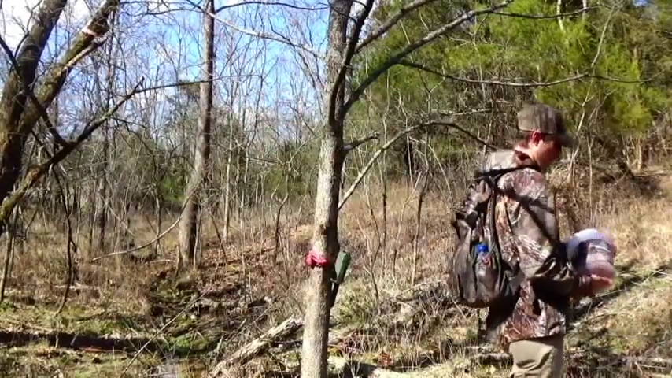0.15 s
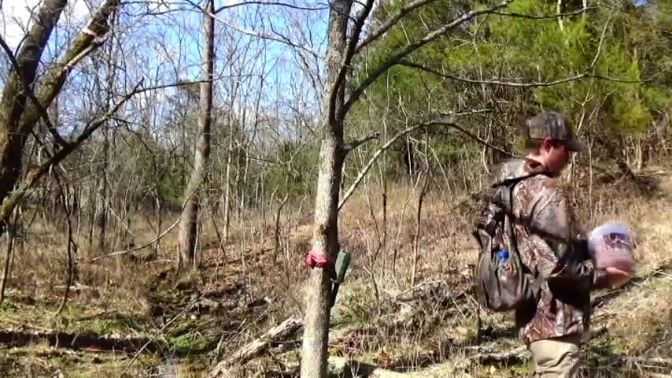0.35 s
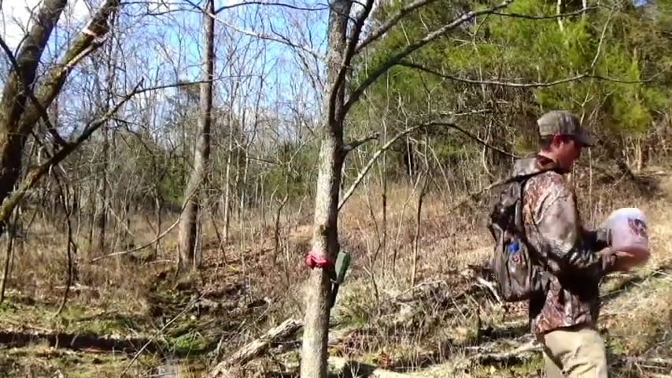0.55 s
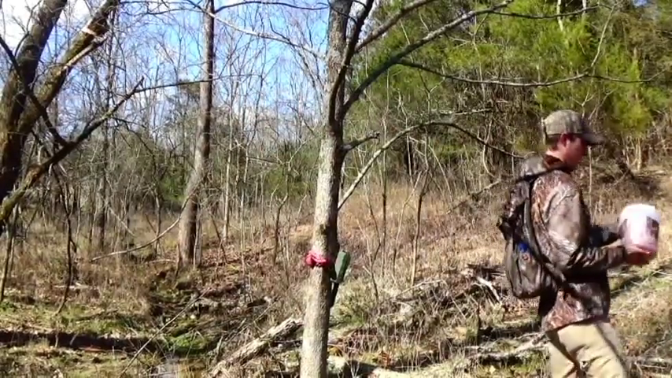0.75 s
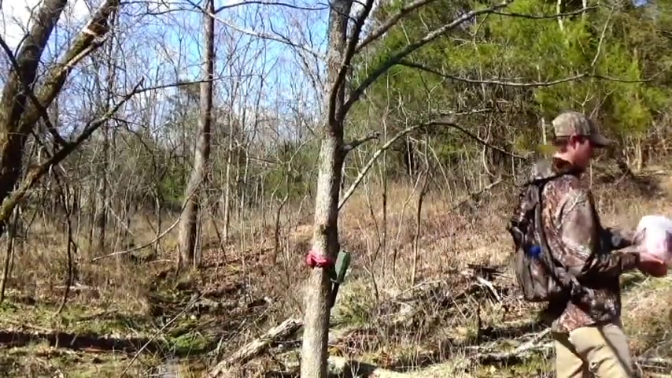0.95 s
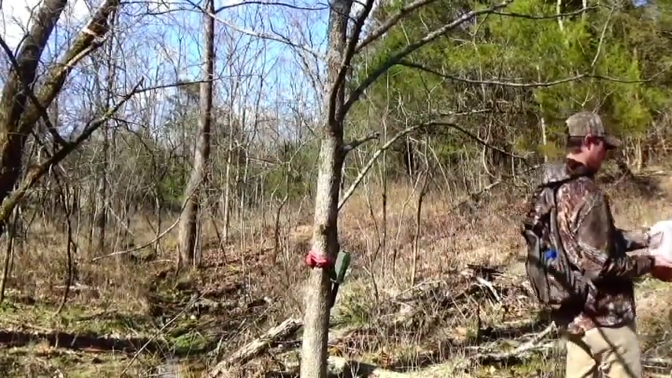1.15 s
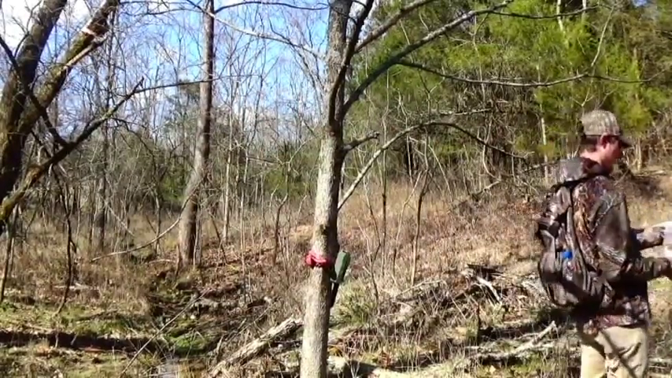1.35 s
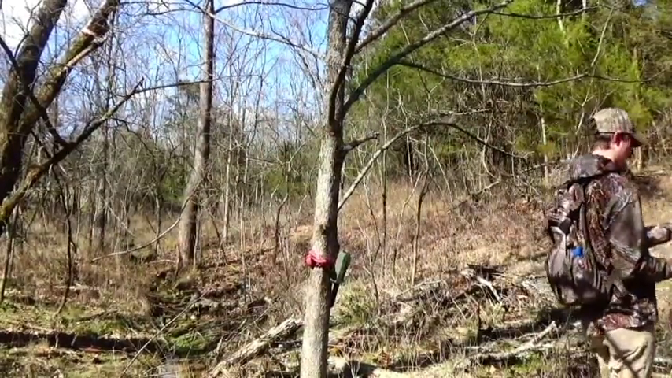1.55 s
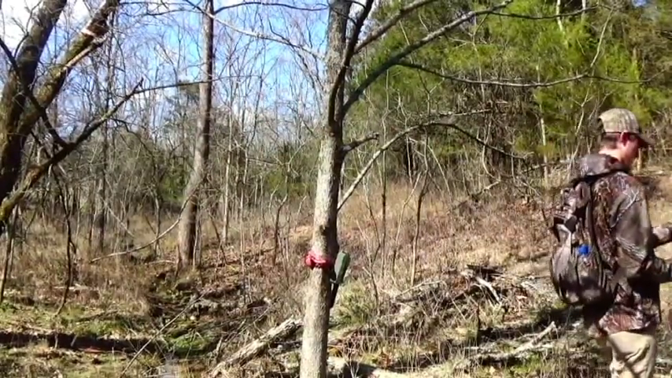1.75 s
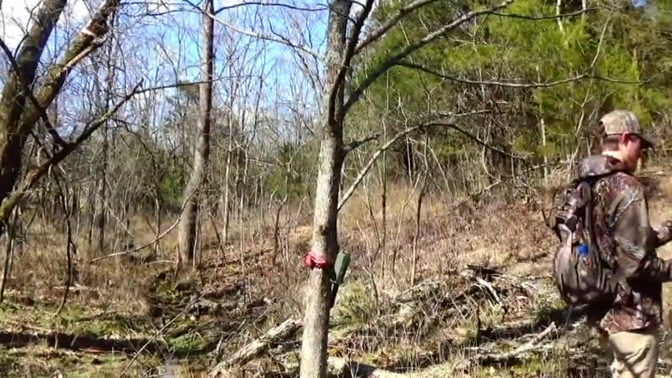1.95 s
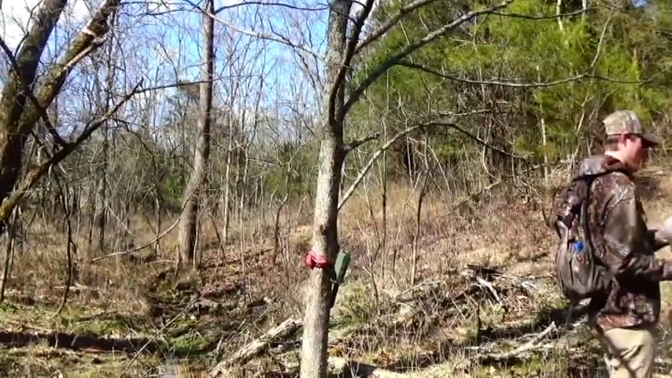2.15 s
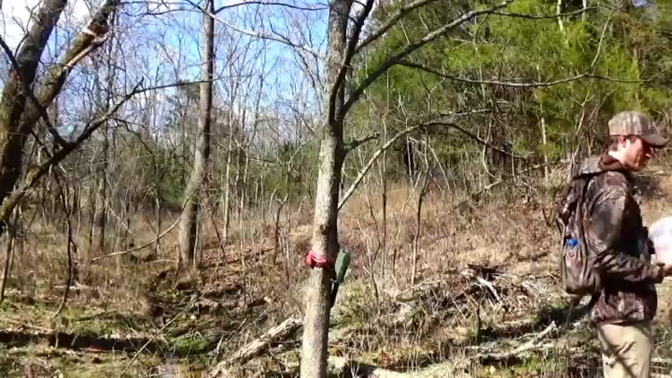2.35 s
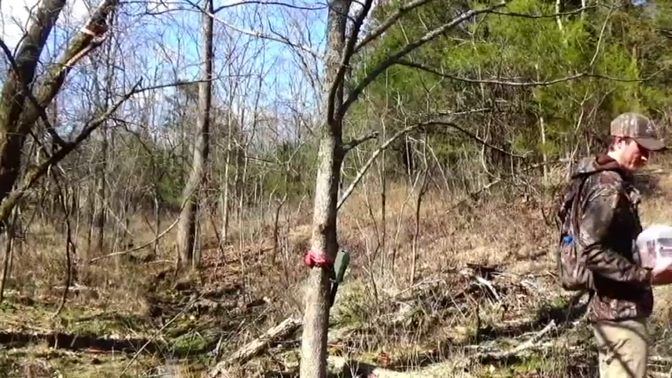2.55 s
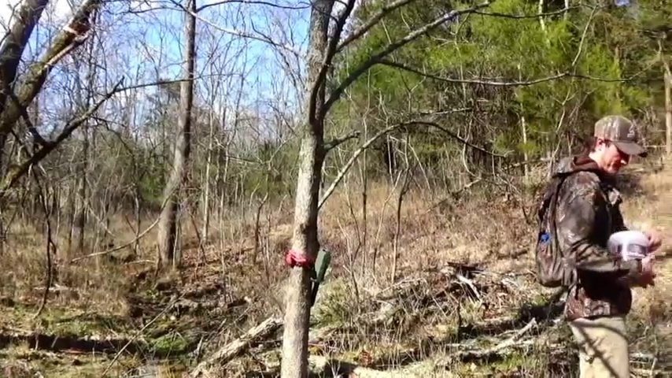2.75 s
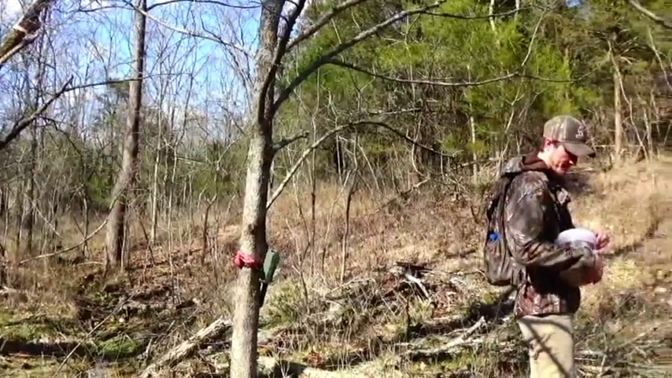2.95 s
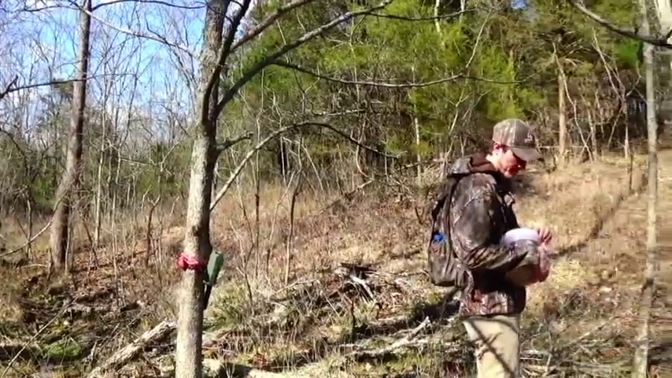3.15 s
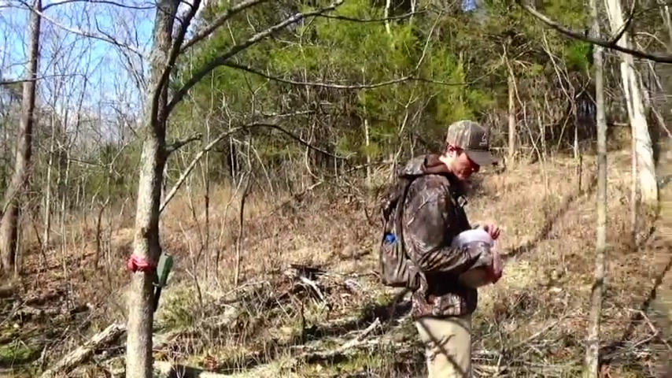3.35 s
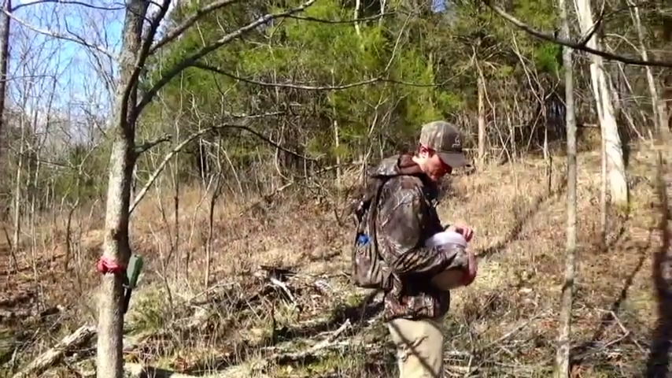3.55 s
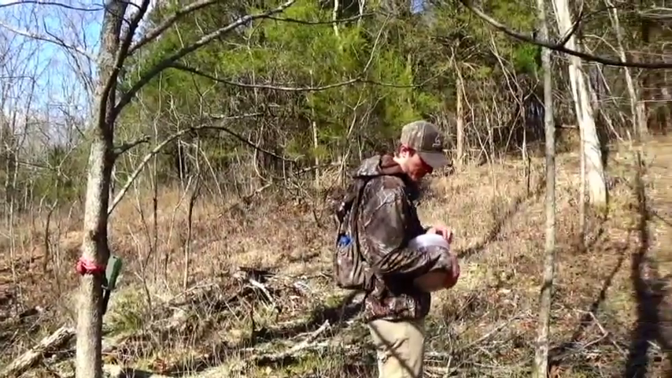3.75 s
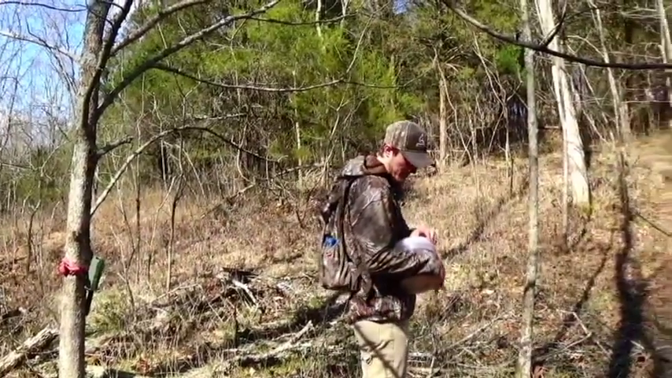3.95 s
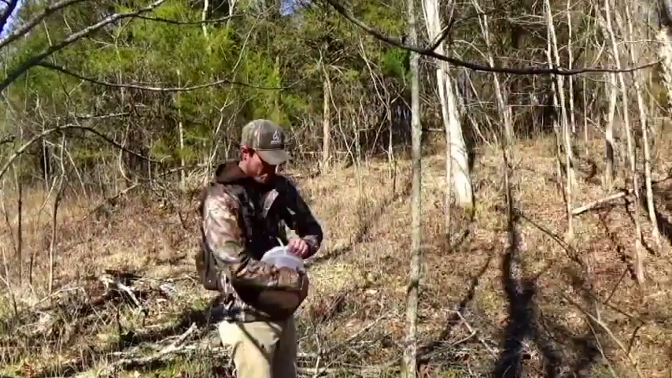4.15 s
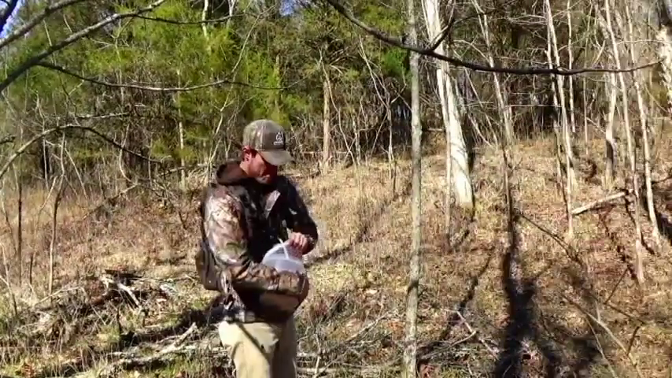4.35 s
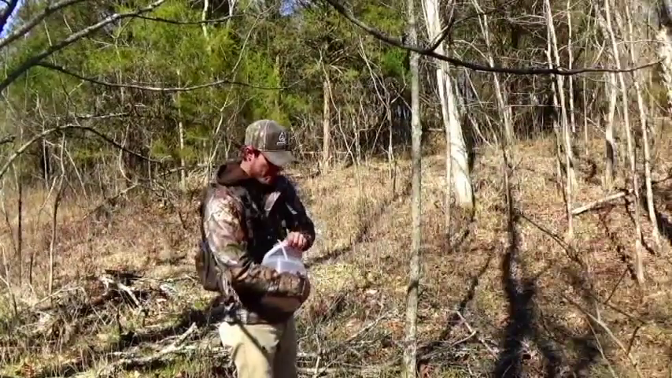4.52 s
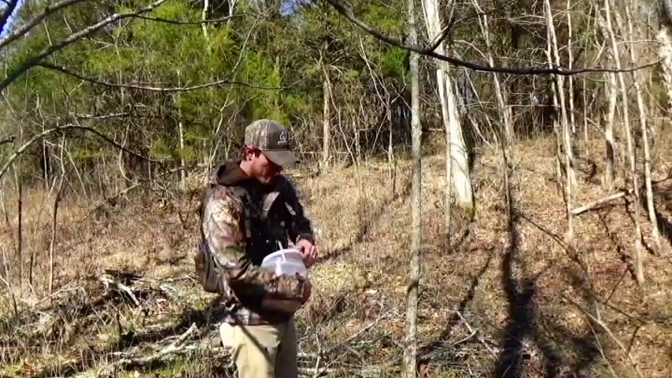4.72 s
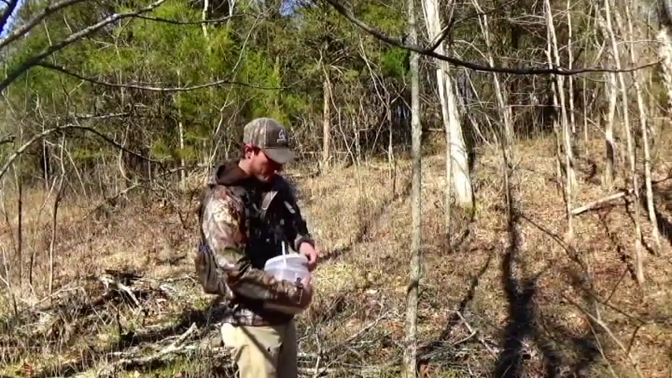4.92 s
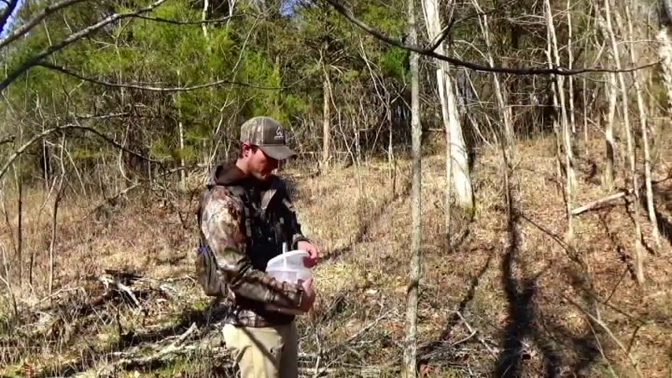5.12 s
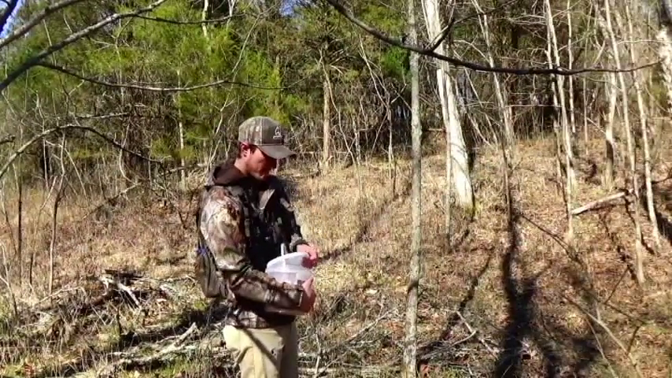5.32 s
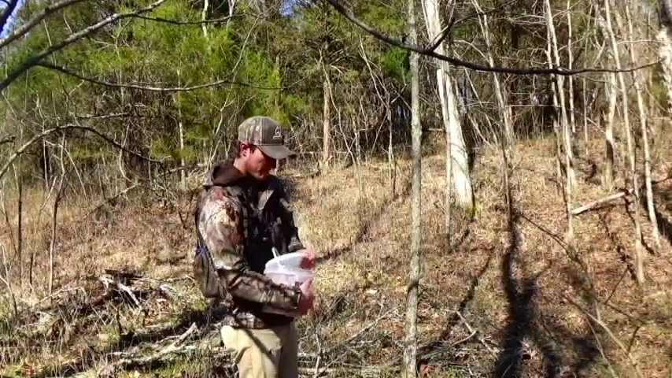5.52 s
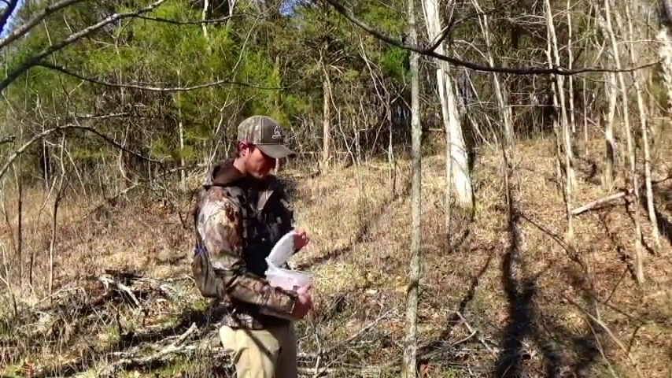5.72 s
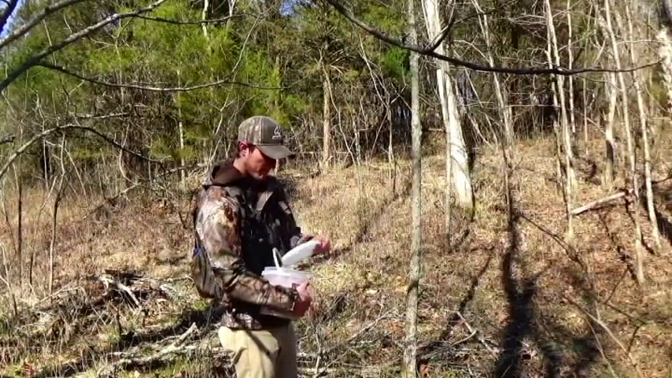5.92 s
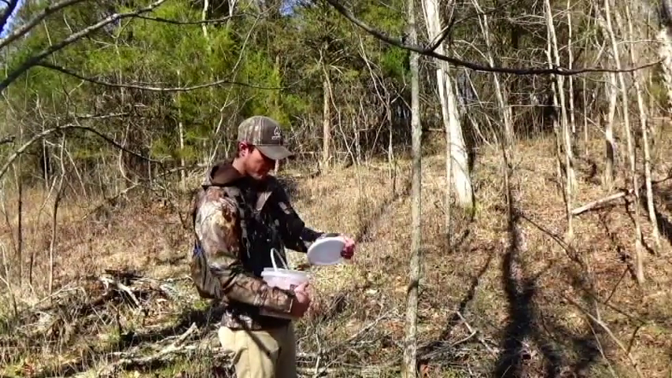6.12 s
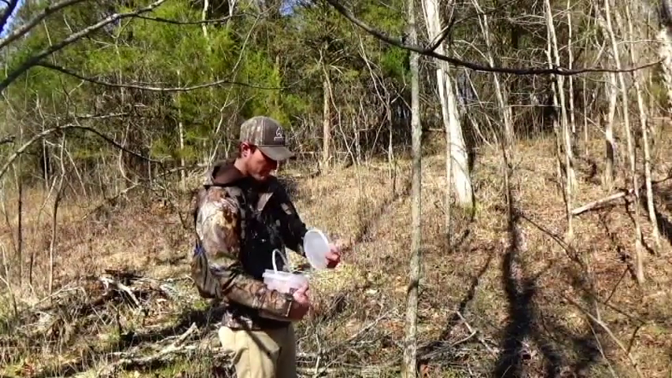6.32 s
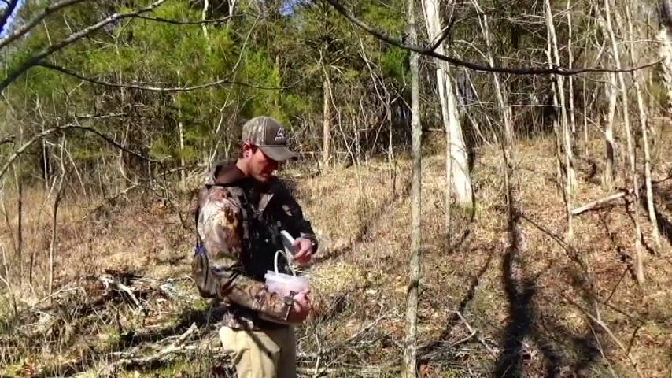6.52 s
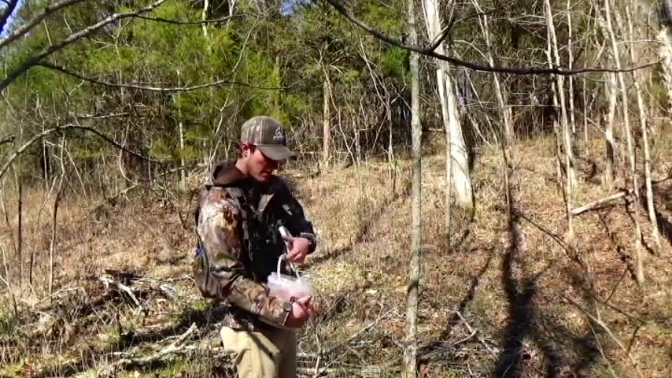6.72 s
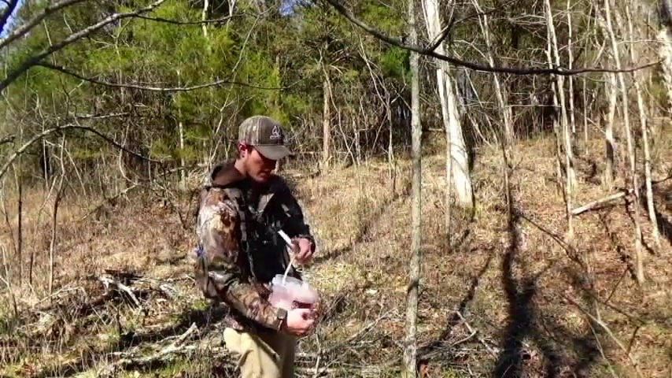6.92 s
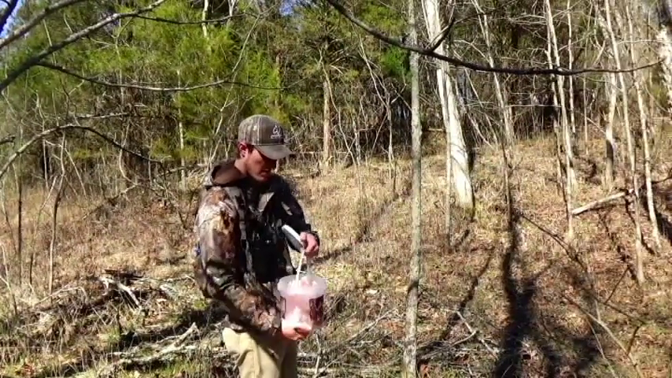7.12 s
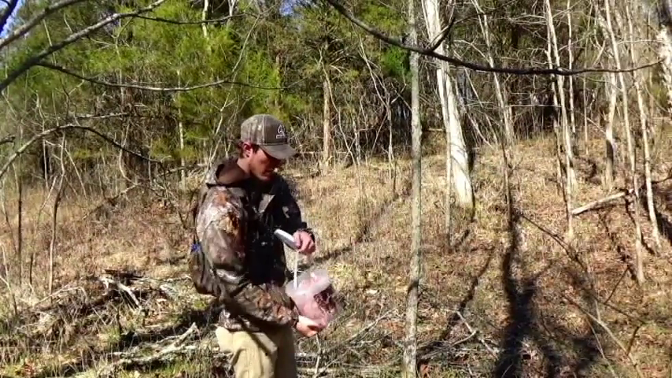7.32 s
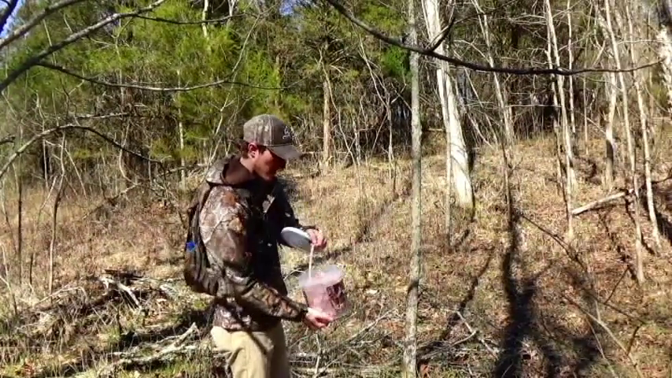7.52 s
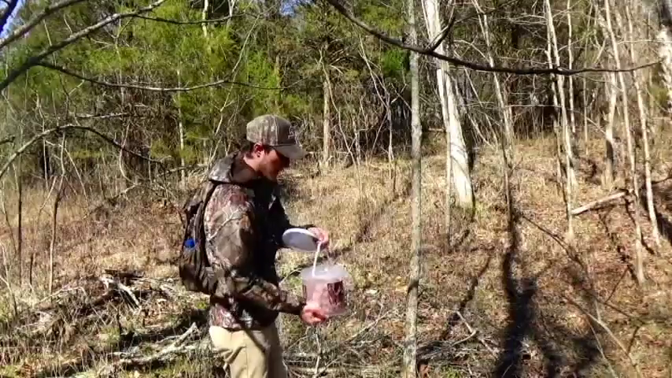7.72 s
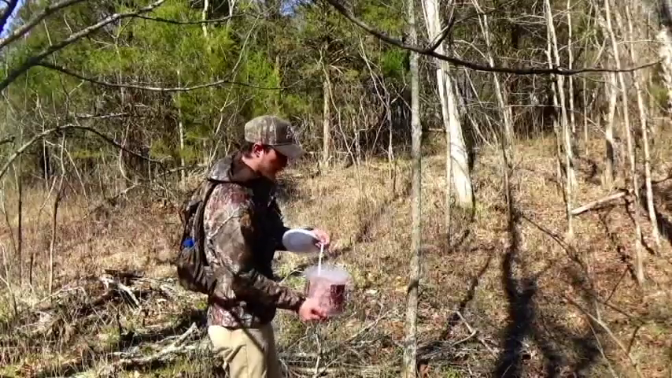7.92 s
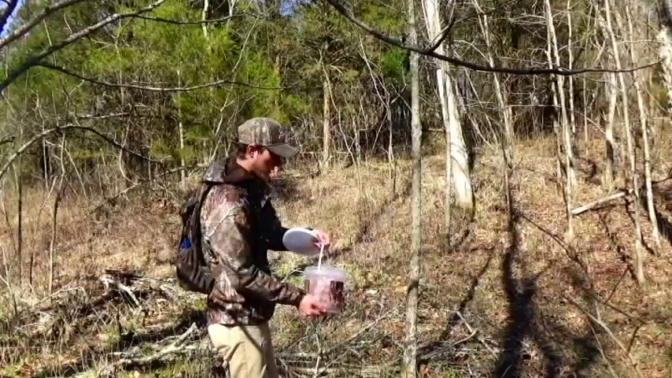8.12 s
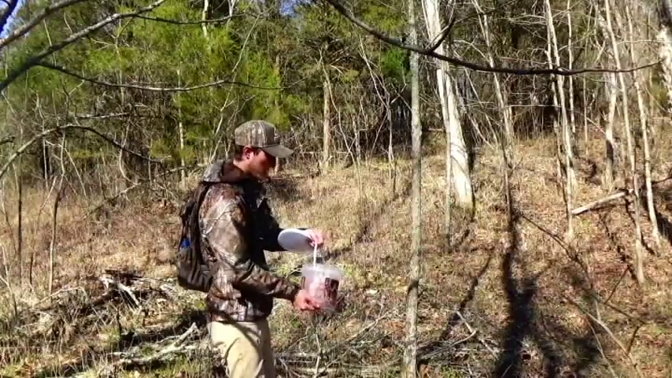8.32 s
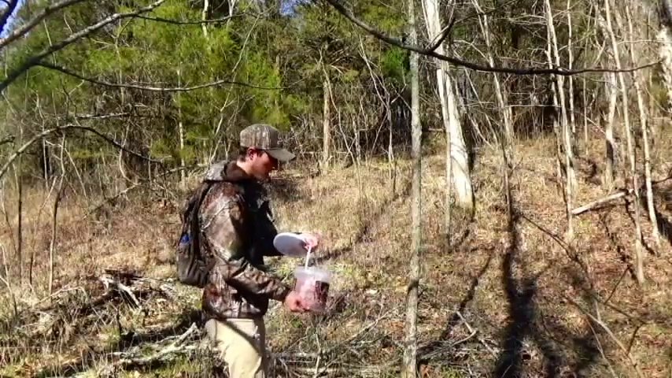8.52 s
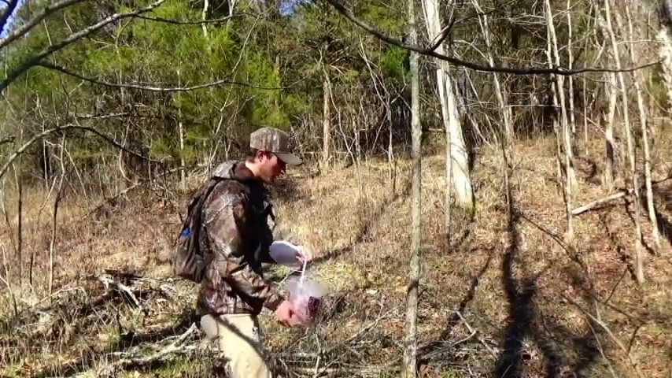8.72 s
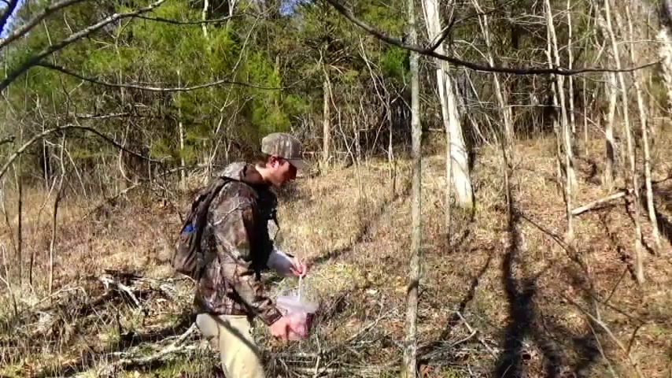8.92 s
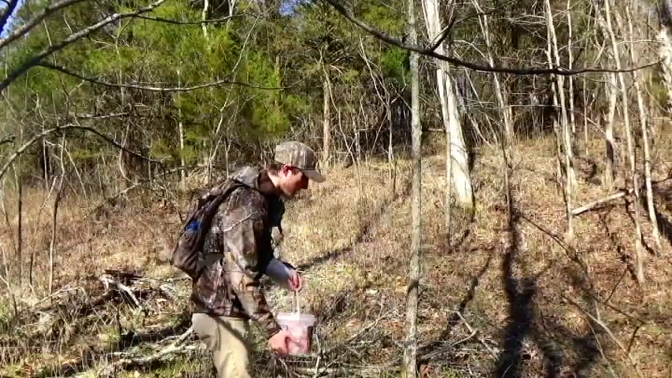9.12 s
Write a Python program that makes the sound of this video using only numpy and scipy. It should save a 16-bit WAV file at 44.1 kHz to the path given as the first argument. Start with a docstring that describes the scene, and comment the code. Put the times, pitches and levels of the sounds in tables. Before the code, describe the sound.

A walker moves through brittle leaves slightly right of centre, with crunches, swishes and small stick cracks. After settling, a hollow plastic thunk begins opening a tub; rubbing and short squeaks lead to a sharp, dominant pop with trailing ticks. The dry load inside rattles in bursts, then soft leaf rustle returns. Open woodland air, light scattered echo, a very faint buzz; the microphone stands at a modest distance.

```python
"""A walker crosses dry leaves and twigs at the edge of a wood: filtered noise and tiny cracks, short noise bursts.
Near 4 s the steps fade and the lid of a plastic bucket is pried off: it pops in two stages as damped wall modes,
while hands rub as noise strokes and the rim creaks as a resonator driven by random slips.
From 7 s the loose load rattles in surges of tiny cracks and knocks on the wall; a few soft steps end the scene.
Throughout, scattered echoes of the trees, quiet outdoor air and a very faint buzz surround it."""
import sys
import numpy as np
from scipy import signal
from scipy.fft import rfft, irfft
from scipy.io import wavfile
from scipy.ndimage import uniform_filter1d

SR = 44100
rng = np.random.default_rng(int(sys.argv[2]) if len(sys.argv) > 2 else 0)


def transcribe(signal):
    """Save signal, clipped to [-1, 1], as a 16-bit WAV file at the path in sys.argv[1]."""
    frames = np.atleast_2d(signal).T
    limited = np.clip(frames, -1, 1)
    pcm = np.round(limited * 32767).astype(np.int16)
    wavfile.write(sys.argv[1], SR, pcm)


N = 408807

# the three bands in which contact sounds are balanced, thud, body and crack: (low edge f/Hz, high edge f/Hz)
BANDS_HZ = [(55, 500), (500, 3500), (3500, 12500)]
FILTERS = [signal.butter(3, band, "bandpass", fs=SR, output="sos") for band in BANDS_HZ]
HIT_T = np.arange(SR // 8) / SR  # time axis of one blow, s
CLOCK = np.arange(0, N / SR + .002, .002)  # slow time axis of the movements, s


def amp(db):
    """Level: an amplitude ratio is ten to the power of decibels over 20."""
    return 10 ** (np.asarray(db) / 20)


def decay(t, t60):
    """Exponential decay: the amplitude falls by 60 dB in t60 seconds."""
    return np.exp(-np.log(1000) * t / t60)


def evened(x):
    """Normalization: scales a signal to an rms of one."""
    return x / np.sqrt(np.mean(x ** 2) + 1e-20)


def read(points, hz):
    """Logarithmic pitch: interpolates a spectrum along a log-frequency axis."""
    f, value = np.transpose(points)
    return np.interp(np.log(hz + 1), np.log(f + 1), value)


def add(mix, s, sound):
    """Superposition: adds a sound to the mix at s seconds."""
    part = mix[max(round(s * SR), 0):][:len(sound)]
    part += sound[:len(part)]


def coloured(x, colour, size=2048):
    """Minimum-phase filtering: a causal filter with the given spectrum keeps attacks sharp."""
    log_gain = np.log(amp(read(colour, abs(np.fft.fftfreq(size, 1 / SR)))))
    # the Hilbert transform of the log gain yields the minimum phase
    spectrum = np.exp(np.conj(signal.hilbert(log_gain)))
    taps = np.fft.ifft(spectrum).real
    return signal.oaconvolve(x, taps[:size // 2])[:len(x)]


def tinted(colour, spread_db):
    """Individual resonance: each piece has a random ripple on the common colour."""
    hz = np.geomspace(50, SR / 2, num=36)
    return np.c_[hz, read(colour, hz) + spread_db * rng.standard_normal(len(hz))]


def patchy(x, patch_db):
    """Spectral modulation: the colour wanders in patches of about 700 Hz by 25 ms as pieces take turns."""
    z = signal.stft(x, nperseg=256)[2]
    field = uniform_filter1d(rng.standard_normal(z.shape), size=4, axis=0)
    field = uniform_filter1d(field, size=8, axis=1)
    return signal.istft(z * amp(patch_db * evened(field)), nperseg=256)[1][:len(x)]


def brittleness(levels):
    """Brittle fracture: the brighter a crack, the smaller the piece and the stronger its first spike."""
    return amp(np.clip(2 * (levels[2] - levels[1]), 0, 14))


def burst(t60, spike, ring_db, ring_t60):
    """Fracture: noise that spreads within a millisecond, one near reflection and a weaker after-ring."""
    dying = decay(HIT_T, t60) + amp(ring_db) * decay(HIT_T, ring_t60)
    onset = 1 - np.exp(-HIT_T / 0.00032)
    x = rng.standard_normal(len(HIT_T)) * dying * onset
    add(x, .0006, np.array([spike]))
    reflection_s = rng.uniform(.002, .0055)
    add(x, reflection_s, -.35 * x.copy())
    return x


def blow(sounds, levels_db):
    """Band energy: thud, body and crack of one blow each carry the energy of 10 ms at their level."""
    parts = [signal.sosfilt(sos, x) for sos, x in zip(FILTERS, sounds)]
    unit_energy = sum(amp(db) * x / np.linalg.norm(x) for x, db in zip(parts, levels_db))
    return unit_energy * np.sqrt(SR / 100)


def swell(start, end, db, rise_s, fall_s, bands_db):
    """Power envelope: a rounded rise, a hold and a steady fall, each 20 dB down after its given seconds."""
    rise = (np.maximum(start - CLOCK, 0) / rise_s) ** 2
    fall = np.maximum(CLOCK - end, 0) / fall_s
    below_db = np.minimum(20 * (rise + fall), 100)
    return np.outer(amp(bands_db), amp(db - below_db)) ** 2


def rustle(power, colour, grains_per_s, spread_db, smooth_shares, clump_db, patch_db):
    """Granular noise: tiny cracks of uneven size over a smooth hiss follow the power of the movements."""
    chance, size = rng.random(N), rng.exponential(1, N)
    sign, hiss = rng.choice([-1, 1], N), rng.standard_normal(N)
    clicks = (chance < grains_per_s / SR) * sign * amp(spread_db * np.minimum(size, 3.5))
    # each crack frays into a millisecond of noise
    fray_power = signal.lfilter([1], [1, -np.exp(-1 / (0.0015 * SR))], clicks ** 2)
    fray = np.sqrt(fray_power) * rng.standard_normal(N)
    grains = patchy(coloured(evened(clicks) + evened(fray), colour), patch_db)
    hiss = coloured(hiss, colour)
    out = 0
    for sos, band_power, share in zip(FILTERS, power, np.clip(smooth_shares, 0, 1)):
        smooth = np.sqrt(share) * evened(signal.sosfilt(sos, hiss))
        rough = np.sqrt(1 - share) * evened(signal.sosfilt(sos, grains))
        # the cracks come in clumps of some ten milliseconds
        clumps = uniform_filter1d(rng.standard_normal(len(CLOCK)), size=5)
        clumps = evened(uniform_filter1d(clumps, size=3))
        envelope = np.sqrt(band_power) * amp(clump_db * clumps)
        out = out + (smooth + rough) * np.interp(np.arange(N) / SR, CLOCK, envelope)
    return out


def air():
    """Interaural coherence: rumble and hiss of the open air are nearly the same at both ears in the bass."""
    # spectrum of the air: (f/Hz, level/dB)
    air_colour = [(12, -36.5), (20, -9.5), (91, 0.5), (208, -13.5), (513, -13), (617, -11), (872, -16.5),
                  (1790, -17.5), (2330, -21), (2960, -17.5), (4300, -21.5), (9050, -24), (10600, -23.5),
                  (11500, -46), (15000, -71), (22000, -120)]
    # correlation of the two ears: (f/Hz, likeness 0-1)
    air_same = [(100, 1), (300, 0.04), (1200, 0.3), (3000, 0.8), (11000, 1)]
    hz = np.fft.rfftfreq(N, 1 / SR)
    a, b = rfft(rng.standard_normal((2, N)))
    same = np.clip(read(air_same, hz), -1, 1)
    mid, side = a * np.sqrt(1 + same), b * np.sqrt(1 - same)
    ears = irfft(np.array([mid + side, mid - side]) * amp(read(air_colour, hz)), N)
    return amp(-71) * evened(ears)


def buzz():
    """Amplitude modulation: a very faint electronic buzz near 3 kHz pulses evenly thirty times a second."""
    t = np.arange(N) / SR
    band = coloured(rng.standard_normal(N), [(2200, -37.5), (2900, -1), (3400, -4.5), (4200, -37)])
    pulse = (1 + np.cos(2 * np.pi * 30 * t)) ** 2
    return amp(-83.5) * evened(band * pulse)


def wood(x, echo_db, width, near_db, near_t60):
    """Scattering: trunks return a long faint echo; the ground close by makes the ears differ a little."""
    # decay time of the echo: (f/Hz, t60/s)
    wood_t60 = [(150, 0.2), (1500, 0.9674), (10000, 0.57)]
    # spectrum of the echo: (f/Hz, level/dB)
    wood_colour = [(300, -3.5), (900, 0), (3000, -5), (10000, -1)]
    taps = rng.standard_normal((2, SR)) * (rng.random((2, SR)) < 2500 / SR)
    # single trunks stand out of the scatter
    taps = taps * amp(4.8 * evened(uniform_filter1d(rng.standard_normal(SR), size=250)))
    hz, t, z = signal.stft(taps, SR, nperseg=256)
    z = z * decay(t, read(wood_t60, hz)[:, None]) * amp(read(wood_colour, hz))[:, None]
    tail = signal.istft(z, SR, nperseg=256)[1]
    tail = tail * (1 - np.exp(-np.arange(tail.shape[1]) / SR / 0.004))
    mid, side = amp(echo_db) * tail / np.linalg.norm(tail[0])
    near = rng.standard_normal(len(HIT_T)) * decay(HIT_T, near_t60)
    near = coloured(near, [(400, -9.5), (2000, 8)])
    side = side * width
    add(side, 0, amp(near_db) * near / np.linalg.norm(near))
    return signal.fftconvolve(x[None], np.array([mid + side, mid - side]), axes=1)[:, :N]


def footsteps():
    """Fracture and friction: leaves swish and crunch under each foot; heels bump and twigs break."""
    # spectrum of the leaves: (f/Hz, level/dB)
    leaf_colour = [(35, -38), (60, -1), (118, -6.5), (157, 1.5), (270, 0), (383, -1), (466, -9.5),
                   (543, -8), (2550, -14), (9440, -9), (11000, -18), (14300, -45), (22000, -120)]
    # common spectrum of twigs and bumps: (f/Hz, level/dB)
    twig_colour = [(70, -13.5), (175, -6), (450, -5), (1100, 2), (2200, -5), (3100, -1), (6000, -5.5),
                   (11000, -14.5)]
    # twigs and leaf stalks breaking underfoot: (t/s, thud level/dB, body level/dB, crack level/dB)
    twigs = [(0.0884, -81.5, -53.5, -53), (0.228, -85.5, -66.5, -52.5), (0.603, -45.5, -39.5, -56),
             (0.8503, -69.5, -55, -58.5), (0.895, -58, -46, -47.5), (0.9271, -63, -56.5, -59),
             (0.9767, -57, -46.5, -47), (0.9953, -70, -49, -64.5), (1.1904, -56.5, -57.5, -61.5),
             (1.2012, -60.5, -55.5, -48), (1.3971, -66, -45, -49), (1.4198, -68, -51, -53),
             (1.4818, -71.5, -55.5, -63), (1.525, -60.5, -56.5, -64.5), (1.784, -53.5, -55.5, -72.5),
             (1.8575, -79.5, -44.5, -40), (2.0695, -74.5, -55.5, -56.5), (2.0954, -51, -47, -49),
             (2.125, -49.5, -51.5, -51), (2.2079, -51.5, -48, -58.5), (2.3092, -71, -51, -59),
             (2.4592, -43.5, -37, -38), (2.663, -59.5, -53, -58.5), (2.8417, -70.5, -58, -60.5),
             (2.903, -59.5, -64.5, -60)]
    # heels and soles bumping the ground: (t/s, level/dB)
    thumps = [(0.4392, -53.5), (1.07, -57.5), (1.163, -56), (1.4381, -60), (1.5767, -56.5), (2.1549, -47),
              (2.2616, -54.5), (2.528, -56.5), (2.5655, -53), (2.795, -55.5), (3.02, -64.5), (3.43, -66),
              (3.6871, -62.5), (3.912, -66.5), (4.03, -68), (4.168, -64), (8.95, -66.5)]
    # a foot pressing the leaves flat: (t/s, level/dB)
    treads = [(0.02, -65.5), (0.12, -69.5), (0.46, -67), (0.61, -61), (0.8, -65), (0.91, -63), (0.99, -61),
              (1.08, -60.5), (1.44, -61.5), (1.54, -64.5), (1.659, -62), (1.938, -58.5), (2.12, -50.5),
              (2.48, -64), (2.68, -66.5), (2.781, -59), (2.93, -64), (3.03, -79.5), (3.15, -68.5),
              (3.441, -67.5), (3.6, -73.5), (8.95, -71), (9.089, -67.5)]
    # a leg sweeping through dry leaves: (peak t/s, rise t/s per 20 dB with its sign unused, fall t/s per 20 dB,
    # level/dB)
    swishes = [(0.195, 0.06, 0.2983, -53), (0.33, -0.16, 0.84, -60), (0.82, -0.28, 0.08, -70),
               (1.02, -0.01, 0.08, -56.5), (1.47, 0.83, 0.11, -67), (2.081, 0.16, 0.1123, -54.5),
               (2.79, 0.09, 0.27, -63), (3.12, 0.5, 0.77, -73), (3.86, 0.23, 0.49, -74),
               (9.08, 0.35, 0.09, -67), (9.23, 0.68, 1.36, -69.5)]
    thump_bands, tread_bands = (0, -6, -14), (-2.12, 0, -7)  # shares of thud, body and crack, dB
    swish_bands, stir_bands = (-34, -13, 0), (-4, 0, -2)
    rise_s, fall_s = 0.0385, 0.1495  # of a tread, per 20 dB
    # leaves and cloth stir all through the walk and settle after it
    power = swell(0, 2.965, -71, rise_s, .8, stir_bands)
    power = power + sum(swell(s, s, db, rise_s, fall_s, tread_bands) for s, db in treads)
    power = power + sum(swell(s, s, db, rise, fall, swish_bands) for s, rise, fall, db in swishes)
    out = rustle(power, leaf_colour, grains_per_s=710, spread_db=5.0,
                 smooth_shares=[.2, .1, .55], clump_db=1.5, patch_db=3)
    bumps = [(s, *np.add(db, thump_bands)) for s, db in thumps]
    for s, *levels in twigs + bumps:
        ground = burst(t60=0.0275, spike=0.47, ring_db=-4, ring_t60=0.132)
        stick = burst(t60=0.0128, spike=7.07, ring_db=-4.5, ring_t60=0.0519)
        crack = burst(t60=0.00985, spike=1.97 * brittleness(levels), ring_db=-42.5, ring_t60=0.04)
        colour = tinted(twig_colour, spread_db=1.5)
        add(out, s, blow([coloured(x, colour) for x in (ground, stick, crack)], levels))
    return out


def rubbing():
    """Sliding friction: hands and lid scrape over the bucket, stroke by stroke."""
    # spectrum of rubbed plastic: (f/Hz, level/dB)
    rub_colour = [(71, -46), (120, -18), (265, -4.5), (339, -1), (534, -13), (723, -10.5), (825, -23),
                  (942, -12), (1350, -9.5), (1790, -15.5), (2870, -15), (3340, -18), (8930, -15),
                  (11000, -24.5), (14300, -55.5), (22000, -120)]
    # strokes over the plastic: (start t/s, end t/s, thud level/dB, scrape level/dB, hiss level/dB)
    rubs = [(4.363, 4.413, -47, -50, -59.5), (4.526, 4.58, -70.5, -73, -69),
            (4.613, 4.69, -67.5, -64, -61.5), (4.722, 4.91, -72, -71.5, -66.5),
            (5.099, 5.125, -67.5, -71, -71), (5.215, 5.235, -65, -68, -68),
            (5.313, 5.35, -69, -60.5, -64.5), (5.392, 5.465, -69.5, -58, -62.5),
            (5.609, 5.67, -69.5, -62.5, -64), (5.679, 5.788, -57, -50.5, -53),
            (5.84, 5.95, -65.5, -63, -70), (6.279, 6.295, -82, -74.5, -67), (6.392, 6.405, -82, -71, -70.5)]
    rise_s, fall_s = .03, 0.059  # per 20 dB
    # the hands shift their grip all the while
    power = swell(4.5, 6.09, -75, rise_s, 0.61, bands_db=(-2, 0, -3))
    power = power + sum(swell(start, end, 0, rise_s, fall_s, levels) for start, end, *levels in rubs)
    return rustle(power, rub_colour, grains_per_s=1100, spread_db=6.5,
                  smooth_shares=[.3, .4, .55], clump_db=1.77, patch_db=2.5)


def creaks():
    """Stick-slip: the rim moves in quick uneven jerks that make the bent lid sing."""
    # the rim dragging along the lip: (start t/s, end t/s, level/dB, pitch f/Hz)
    drags = [(5.089, 5.145, -63, 717.5), (5.191, 5.235, -67, 697), (5.289, 5.34, -70, 731),
             (5.358, 5.485, -56, 685), (5.56, 5.69, -65, 761)]
    out = np.zeros(N)
    for start, end, db, hz in drags:
        t = np.arange(0, end - start, 1 / SR)
        slips = (rng.random(N) < 900 / SR)[:len(t)] * 1.
        ring = np.sin(2 * np.pi * hz * HIT_T) * decay(HIT_T, 0.099)
        song = evened(signal.oaconvolve(slips - slips.mean(), ring)[:len(t)])
        add(out, start, amp(db) * song * signal.windows.tukey(len(t), .5))
    return out


def load():
    """Granular impact: loose pieces trickle, surge at each shake and knock against the plastic wall."""
    # spectrum of the load: (f/Hz, level/dB)
    load_colour = [(88, -54), (150, -20.5), (211, -21), (248, -15), (396, -6), (679, -3.5), (798, -9),
                   (1010, 0.5), (1270, -7.5), (1440, 0.5), (1640, -6.5), (3020, -4), (4730, -6.5),
                   (9360, -11.5), (11000, -18.5), (14300, -71), (22000, -120)]
    # surges of the load as the bucket is shaken: (peak t/s, level/dB)
    shakes = [(6.965, -63.5), (7.15, -54), (7.24, -57.5), (7.421, -45), (7.52, -56.5), (7.635, -52),
              (7.725, -57), (7.822, -50.5), (7.908, -51.5), (8.041, -52.5), (8.09, -56), (8.23, -51),
              (8.403, -46.5), (8.46, -58), (8.59, -64)]
    # clumps of the load knocking on the wall: (t/s, thud level/dB, body level/dB, crack level/dB)
    knocks = [(6.9498, -72.5, -47.5, -61), (7.0472, -73.5, -47, -55.5), (7.1229, -70, -50, -60.5),
              (7.289, -60, -40.5, -50), (7.3243, -71, -46.5, -64.5), (7.4267, -49, -43.5, -48.5),
              (7.4541, -68, -45, -48.5), (7.4954, -69.5, -51, -71.5), (7.5465, -62, -46.5, -58),
              (7.6446, -65.5, -44, -47), (7.7278, -59, -51.5, -48), (7.9127, -51, -44.5, -58),
              (7.935, -63.5, -48, -53.5), (8.03, -54, -44, -45), (8.0413, -56, -43, -51),
              (8.099, -55.5, -49, -56), (8.1762, -73.5, -51, -50.5), (8.2383, -63, -45.5, -48.5),
              (8.3063, -52, -51, -66), (8.434, -42, -35.5, -46), (8.5051, -62.5, -46, -59),
              (8.5802, -55, -51, -56), (8.6021, -52, -51, -70), (8.662, -60, -57.5, -66)]
    load_bands = (-6, 0, -4)  # shares of thud, rattle and hiss, dB
    rise_s, fall_s = 0.075, 0.0994  # of a surge, per 20 dB
    # between shakes the load keeps trickling
    power = swell(7.1, 8.52, -64, 0.236, .4, load_bands)
    power = power + sum(swell(s, s, db, rise_s, fall_s, load_bands) for s, db in shakes)
    out = rustle(power, load_colour, grains_per_s=450, spread_db=2.5,
                 smooth_shares=[.08, .04, .08], clump_db=1.79, patch_db=2.5)
    for s, *levels in knocks:
        wall = burst(t60=0.0223, spike=4.42, ring_db=-15, ring_t60=0.0723)
        tick = burst(t60=0.0115, spike=3 * brittleness(levels), ring_db=-9, ring_t60=0.034)
        colour = tinted(load_colour, spread_db=2.0)
        add(out, s, blow([coloured(x, colour) for x in (wall, wall, tick)], levels))
    return out


def lid():
    """Modal synthesis: each slip of the rim cracks and rings the bucket, which drums lower while sealed."""
    # modes of bucket and lid: (f/Hz, level/dB, t60/s, extra level while sealed/dB)
    bucket = [(260, -10.5, 0.038, 15.5), (389.3, 0.5, 0.064, 4), (466, -2.5, 0.036, 7),
              (618.4, -0.5, 0.041, 0.5), (716.3, 0, 0.07, -0.5), (838.4, -7, 0.074, -2),
              (1022.3, 1.5, .045, -8), (1457, -7, 0.064, -4), (2460, -10, 0.012, -15.5),
              (5600, -5.5, 0.0088, -0.5), (6500, -12, 0.011, -9), (8420, -3, 0.018, -5.5)]
    # the rim slipping and snapping over the lip: (t/s, thud level/dB, body level/dB, crack level/dB)
    lid_snaps = [(4.3359, -33, -36, -38), (4.3685, -40.5, -46, -49), (4.3767, -43, -45, -52.5),
                 (4.3883, -40, -45.5, -40.5), (4.394, -43, -48.5, -39.5), (4.4018, -46.5, -42.5, -48.5),
                 (4.413, -45, -45, -54), (4.561, -88, -58.5, -58), (4.593, -63, -53, -56.5),
                 (4.8308, -85, -60.5, -66), (4.9613, -92, -64, -57.5), (5.05, -77, -62, -67),
                 (5.2285, -49, -50, -56.5), (5.4679, -64.5, -46, -56.5), (5.6205, -67.5, -52, -62),
                 (5.683, -24.5, -21, -21.5), (5.731, -63.5, -41, -47.5), (5.7584, -70, -42, -48),
                 (5.7851, -65.5, -43.5, -36.5), (5.7865, -66.5, -40.5, -43), (5.8078, -60.5, -37.5, -41.5),
                 (5.8616, -61.5, -48, -66.5), (5.9225, -67.5, -47, -48), (5.955, -74, -50.5, -52.5),
                 (5.987, -72, -58.5, -57), (6.0228, -81, -58.5, -64), (6.68, -91, -80.5, -66.5)]
    out = np.zeros(N)
    hz, mode_db, t60, sealed_db = np.transpose(bucket)[:, :, None]
    unsealed_s = 5
    # the hands soak up the first wide swing within a few milliseconds
    dying = decay(HIT_T, t60) * (1 + 1.2 * np.exp(-(HIT_T / .007) ** 4))
    signs = (-1) ** np.arange(len(hz))[:, None]
    modes = signs * np.sin(2 * np.pi * hz * HIT_T) * dying
    onset = 1 - np.exp(-HIT_T / .0005)
    thin_wall = signal.butter(2, 330, "highpass", fs=SR, output="sos")
    for s, *levels in lid_snaps:
        strike_db = mode_db + sealed_db * (s < unsealed_s) + rng.standard_normal(hz.shape)
        ring = (amp(strike_db) * modes).sum(0) * onset
        crack = signal.sosfilt(thin_wall, burst(t60=0.012, spike=2, ring_db=-24.5, ring_t60=0.14))
        crack = coloured(crack, tinted([(500, 1), (7500, 2.8), (11000, -1.5)], spread_db=1.5))
        # a heavy pop flexes the whole wall; a light tick stays in the rim
        flex = amp(np.clip(.5 * (levels[0] - levels[1]) - 11.0, -22, -6))
        add(out, s, blow([flex * ring + crack] * len(BANDS_HZ), levels))
    return out


def scene():
    """Direct and scattered sound: the walker, a little to the right at first, among the trees."""
    # where the walker is: (t/s, left minus right level/dB)
    bearing = [(0, -1.5), (.9, -2.5), (2.1, -3), (2.7, -1.94), (4.2, 0), (5.7, 0.78), (7.2, 0.5)]
    walker = footsteps() + rubbing() + lid() + creaks() + load()
    pan_db = np.interp(np.arange(N) / SR, *np.transpose(bearing))
    direct = walker * amp(np.array([pan_db, -pan_db]) / 2)
    echo = wood(walker, echo_db=-20, width=0.49, near_db=-11.0, near_t60=0.013)
    return direct + echo + air() + buzz()


def record(dry):
    """Band limitation: a linear-phase low-pass removes the treble above about 11 kHz."""
    taps = signal.firwin(255, 11150, window=("kaiser", 7), fs=SR)
    return signal.oaconvolve(dry, taps[None], "same")


dry = scene()
out = record(dry)
transcribe(out)
```